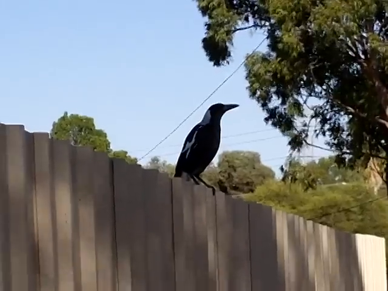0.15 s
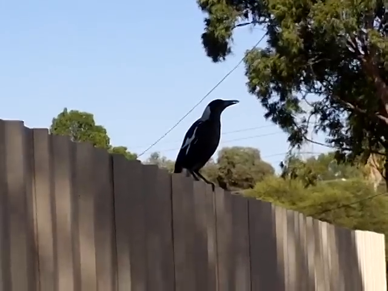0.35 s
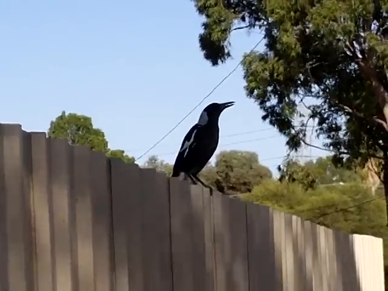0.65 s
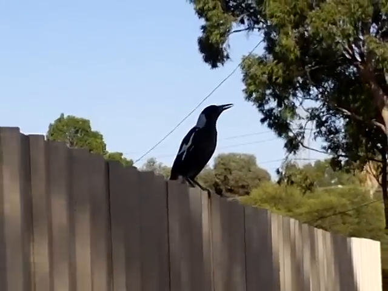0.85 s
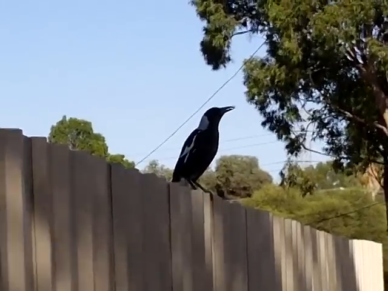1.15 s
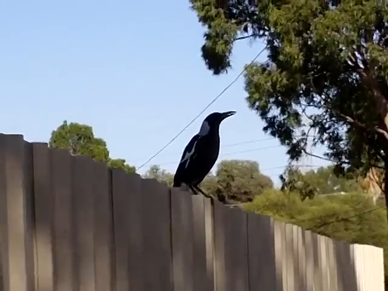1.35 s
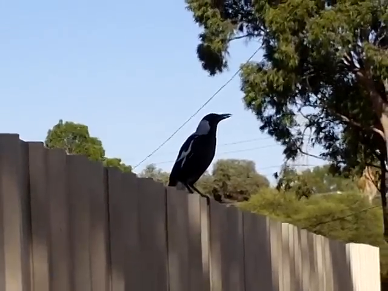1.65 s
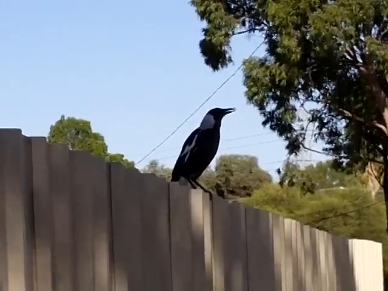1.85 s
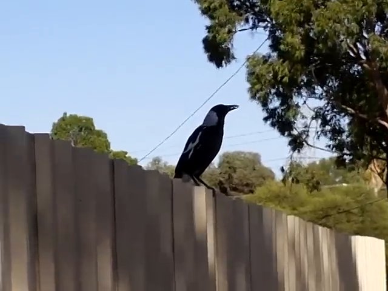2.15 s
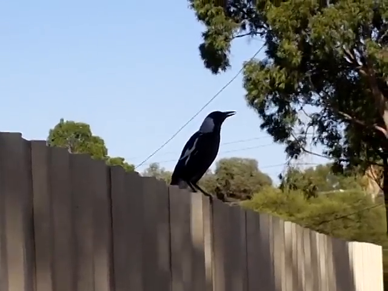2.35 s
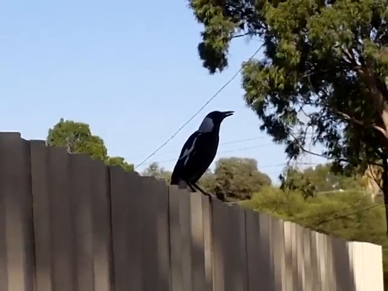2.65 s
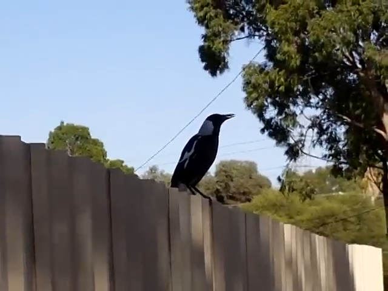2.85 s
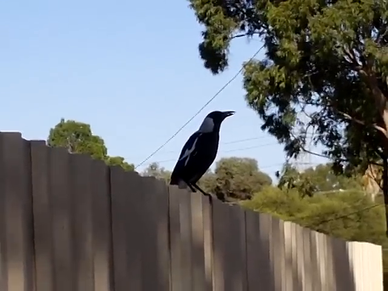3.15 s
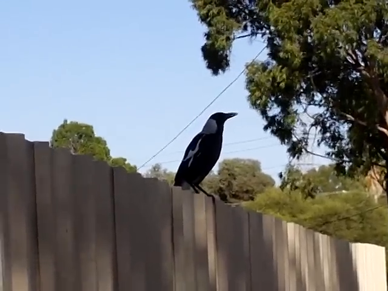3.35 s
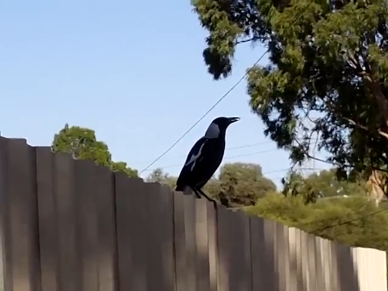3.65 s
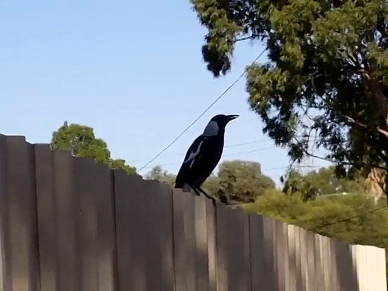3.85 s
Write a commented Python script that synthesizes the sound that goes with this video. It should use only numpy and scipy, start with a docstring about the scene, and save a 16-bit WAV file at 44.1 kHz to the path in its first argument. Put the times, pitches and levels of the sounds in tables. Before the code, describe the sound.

A magpie sings soft fluty warbling notes and gurgles while a nearer bird squawks twice sharply.

```python
"""Magpie song in a yard

A magpie sings soft fluty notes, pips, trills and gurgles, often in two voices: near sines with faint overtones.
A nearer bird squawks twice: harmonics and breath noise, shaken by a rattle and coloured by a throat.
Far birds whistle (gliding near sines) and buzz (throbbing band noise); traffic hums as shaped noise. Broad
noise gives the dying end of an earlier squawk at the outset and a passing swell later.
Fences and walls return echoes and a short tail; a phone microphone cuts the very top.
"""
import sys
import numpy as np
from scipy import signal
from scipy.fft import rfft, irfft
from scipy.io import wavfile
from scipy.ndimage import uniform_filter1d

SR = 44100
rng = np.random.default_rng(int(sys.argv[2]) if len(sys.argv) > 2 else 0)


def to_wav(s):
    """Save 16-bit WAV."""
    ch = np.atleast_2d(s).T  # columns
    pcm = np.round(np.clip(ch, -1, 1) * 32767)  # PCM
    wavfile.write(sys.argv[1], SR, pcm.astype(np.int16))


def convert_level_to_amplitude(level_db):
    """Map a level in decibels to its linear amplitude factor."""
    exponent = np.asarray(level_db, float) / 20
    return 10 ** exponent


N = 176400
T = np.arange(N) / SR


def level(x, db):
    """Normalisation: scale a signal to a given rms level."""
    return x * convert_level_to_amplitude(db) / np.sqrt(np.mean(x ** 2))


def walk(rate):
    """Random modulation: levels held 1 / rate s and slewed twice; spread near 1."""
    hold = int(SR / rate)
    steps = np.repeat(rng.standard_normal(N // hold + 1), hold)
    return 1.3 * uniform_filter1d(uniform_filter1d(steps, hold), hold)[:N]


def shade(hz, table):
    """Frequency response: gain interpolated over log frequency in a (hz, db) table."""
    table = np.array(table)
    return convert_level_to_amplitude(np.interp(np.log(hz + 1), np.log(table[:, 0]), table[:, 1]))


def add(out, start, x):
    """Superposition: mix x in from a time on."""
    i = int(start * SR)
    x = x[max(-i, 0):N - i]
    out[max(i, 0):max(i, 0) + len(x)] += x


# noise spectrum of the hum: pitch_hz [Hz], level_db [relative dB per Hz]
HUM_SPECTRUM = [(25, -36.5), (100, -18), (350, -13.5), (520, -9), (700, -6), (1100, 0.5), (1900, -11.5),
                (2500, -19), (5400, -25), (8500, -30), (11800, -36.5), (15500, -48.5)]


def traffic():
    """Shaped noise: a hum whose octave bands drift independently."""
    f = np.fft.rfftfreq(N, 1 / SR)
    octave = np.log2(f + 1)
    white = rfft(rng.standard_normal(N)) * shade(f, HUM_SPECTRUM)
    hum = np.zeros(N)
    for centre in range(4, 16):
        band = np.clip(1 - abs(octave - centre), 0, 1)
        hum += convert_level_to_amplitude(walk(3)) * irfft(white * band, N)  # drift near 1 dB
    return level(hum, -59.5)


# rushes of broad noise, the dying end of an earlier squawk, then a passing swell: start_s [s], rise_s [s],
# fall_s (decay constant) [s], level_db (at the crest) [dB], tilt_db (treble) [dB per octave]
RUSHES = [(-.05, 0.075, 0.11, -62.5, 8), (2.9, 0.1, 0.36, -54.5, -0.5)]


def rushes():
    """Noise bursts: the dying end of an earlier squawk, then a passing swell, as the hum's spectrum tilted."""
    out = np.zeros(N)
    f = np.fft.rfftfreq(N, 1 / SR)
    for start, rise, fall, db, tilt in RUSHES:
        band = (f > 450) / (1 + (f / 8500) ** 8)
        spectrum = shade(f, HUM_SPECTRUM) * convert_level_to_amplitude(tilt * np.log2(f + 1)) * band
        noise = irfft(rfft(rng.standard_normal(N)) * spectrum, N)
        t = np.clip(T - start, 0, None)
        out += level(noise, db) * np.where(t < rise, t / rise, np.exp(-(t - rise) / fall))
    return out


# distant buzzy calls: start_s [s], length_s [s], centre_hz [Hz], width_hz [Hz],
# level_db (before the swell and fade) [dB]
BUZZES = [(1.53, 0.38, 4620, 450, -69.5)]


def buzzes():
    """Amplitude modulation: a fast chirr, blurred by distance into a throbbing band of noise."""
    out = np.zeros(N)
    rate_hz, depth = 88, 0.35
    for start, length, hz, width, db in BUZZES:
        u = np.linspace(0, 1, int(length * SR))
        throb = 1 + depth * np.sin(2 * np.pi * rate_hz * length * u)
        chirr = rng.standard_normal(len(u)) * throb
        edges = (hz - width / 2, hz + width / 2)
        band = signal.sosfilt(signal.butter(3, edges, "band", fs=SR, output="sos"), chirr)
        add(out, start, level(band, db) * np.abs(np.sin(np.pi * u ** 0.53)) ** 0.97)
    return out


# overtones: pitch_hz (of the overtone) [Hz], level_db (relative to the note at full effort) [dB]
OVERTONES = [(1400, -6.5), (2050, -20.5), (2350, -49), (3300, -31), (4600, -33), (5800, -39.5), (8000, -63)]
FULL_EFFORT_DB = -40  # note level from which the overtones grow no further relative to it


def flute(hz, gain, bright=1):
    """Harmonic series: a near sine whose faint overtones grow with effort; gain is rms."""
    phase = 2 * np.pi * np.cumsum(hz) / SR
    effort = bright * np.minimum(uniform_filter1d(gain, size=1500) / convert_level_to_amplitude(FULL_EFFORT_DB), 1) ** 2
    overtones = sum(shade(k * hz, OVERTONES) * np.sin(k * phase) for k in range(2, 7))
    return np.sqrt(2) * gain * (np.sin(phase) + effort * overtones)


def pips(table):
    """Frequency glide under a raised-cosine envelope: each pip swells and fades as its pitch slides."""
    out = np.zeros(N)
    for mid, length, hz, glide, db in table:
        u = np.linspace(0, 1, int(length * SR))
        add(out, mid - length / 2, flute(hz + glide * (u - .5), convert_level_to_amplitude(db) * np.sin(np.pi * u) ** 2))
    return out


# distant whistles: middle_s [s], length_s [s], pitch_hz [Hz], glide_hz [Hz], peak_db (before the blur) [dB]
WHISTLES = [(1.37, 0.067, 3250, -259, -74), (2.821, 0.016, 4550, 343, -70), (3.099, 0.11, 6100, 225, -77),
            (0.017, 0.015, 1760, 300, -56), (.17, 0.22, 3630, 800, -69.5), (.25, .08, 3330, -200, -67.5),
            (.3, .2, 3670, -250, -73.5), (1.73, .26, 3990, 22, -75.5), (3.247, .035, 3140, 405, -68),
            (3.44, 0.36, 3204, -350, -75)]


def far_whistles():
    """Scintillation: far gliding whistles are blurred on the way by fast random gain."""
    return pips(WHISTLES) * (.5 + walk(600))


# squawks: start_s [s], length_s [s], pitch_hz (top of the arch, before the shaking) [Hz],
# arch (share of pitch), level_db (before the voice and breath mix and the envelope) [dB]
SQUAWKS = [(1.944, .043, 1898, 0.061, -40), (2.039, .072, 2577, .28, -35.5)]
# share of breath in the mix of each squawk
SQUAWK_BREATH = (.5, .24)
# rattle of each squawk: rate_hz [Hz], depth (share of pitch)
SQUAWK_RATTLE = ((280, .13), (309, 0.21))
# throat response, one table for each squawk: pitch_hz [Hz], level_db [relative dB]
SQUAWK_THROATS = ([(1500, -38), (1930, -7.5), (2620, -22), (3500, -8), (5450, -1.5), (6120, -10.5),
                  (6810, 1.5), (11100, -34), (15000, -24)], [(1700, -29), (2100, -13.5), (2500, -30),
                  (3500, -1.5), (4900, -3.5), (6200, -6), (7300, -11.5), (11100, -31), (15000, -27)])


def squawks():
    """Source and filter: a tone of arching pitch, shaken by a rattle that also gates the breath."""
    out, shake = np.zeros(N), walk(900)
    attack, jitter = .33, .006  # share of length, share of pitch
    k = np.arange(1, 8)[:, None]  # harmonic numbers
    f = np.fft.rfftfreq(4096, 1 / SR)
    for call, noise, (rate, depth), throat in zip(SQUAWKS, SQUAWK_BREATH, SQUAWK_RATTLE, SQUAWK_THROATS):
        start, length, hz, arch, db = call
        u = np.linspace(0, 1, int(length * SR))
        rising = u < attack
        bow = np.where(rising, u / attack, (1 - u) / (1 - attack))
        rattle = abs(np.cos(np.pi * rate * length * u))
        pitch = hz * (1 - arch * (1 - bow) ** 2 * np.where(rising, 1, .5))  # the fall is half as deep
        pitch = pitch * (1 - depth * (1 - rattle))
        pitch = pitch * (1 + jitter * shake[int(start * SR):][:len(u)])
        phase = 2 * np.pi * np.cumsum(pitch) / SR
        voiced = (shade(k * pitch, throat) * np.sin(k * phase)).sum(axis=0)
        breath = irfft(rfft(rng.standard_normal(4096)) * shade(f, throat))[:len(u)]
        mix = (1 - noise) * level(voiced * (0.38 + rattle), 0) + noise * level(breath * (.5 + rattle), 0)
        envelope = bow ** np.where(rising, .7, .8) * np.clip((1 - u) / 0.054, 0, 1)
        add(out, start, convert_level_to_amplitude(db) * mix * envelope)
    return out


# throaty gurgles between the notes: start_s [s], length_s [s], peak_db (of the loudest possible blip) [dB]
GURGLES = [(0.8, 0.087, -58), (1.327, 0.12, -54), (1.71, .29, -57), (2.651, .25, -55.5), (3.6, .4, -64)]
# lowest and highest middle pitch of the blips [Hz]
GURGLE_HZ = (600, 2100)


def gurgles():
    """Granular texture: quick soft blips of log-uniform random pitch, the higher the softer."""
    lo, hi = GURGLE_HZ
    per_s = 130
    blips = []
    for start, length, db in GURGLES:
        for a, b, c, d, e in rng.random((int(length * per_s), 5)):
            pitch = lo * (hi / lo) ** c
            blips.append((start + a * length, .008 + .014 * b, pitch, 300 * (d - .5), db - 10 * c - 6 * e))
    return pips(blips)


# trills: start_s (middle of the first pulse) [s], spacing_s [s], pitch_hz [Hz],
# peak_db (after the softer first pulse) [dB]
TRILLS = [(.448, 0.012, 978, -42.5), (.489, 0.015, 936, -47.5), (.515, .0135, 964, -44),
          (2.612, 0.012, 1122, -44.5)]


def trills():
    """Pulse train: three quick, slightly overlapping pulses of steady pitch."""
    soft_start_db, duty = 7.5, 1.1  # dB, pulse length as share of spacing
    pulses = []
    for start, gap, hz, db in TRILLS:
        for k in range(3):
            pulses.append((start + k * gap, duty * gap, hz, 0, db - soft_start_db * (k == 0)))
    return pips(pulses)


WAVER_DB, SOFT_WAVER = .6, 4  # loudness waver of loud notes; most extra multiples of it when soft
# short pips: middle_s [s], length_s [s], pitch_hz [Hz], glide_hz [Hz], peak_db (before the waver) [dB]
PIPS = [(0.412, 0.048, 1345, -12, -47.5), (0.414, 0.085, 1164, -37, -52), (0.414, 0.083, 992, 30, -53),
        (0.582, 0.043, 996, -66, -50.5), (0.648, 0.046, 986, -109, -56.5), (0.828, 0.011, 1086, 88, -40),
        (0.859, 0.058, 992, 22, -49.5), (0.973, 0.021, 1350, -70, -50), (0.989, 0.039, 1168, -16, -45),
        (0.992, 0.027, 994, 45, -45.5), (1.063, 0.105, 1008, -71, -53.5), (1.383, 0.039, 1557, 62, -51.0),
        (1.729, 0.034, 762, 77, -56.5), (1.843, 0.007, 1256, -99, -43.5), (1.867, 0.021, 995, 86, -46),
        (1.947, 0.073, 1170, -7, -55), (2.039, 0.092, 717, -71, -59), (2.173, 0.037, 1192, 8, -45.5),
        (2.683, 0.066, 1310, 235, -47.5), (2.716, 0.032, 992, 21, -52), (2.782, 0.03, 1578, -220, -54.5),
        (2.827, 0.022, 1149, 16, -40), (2.842, 0.026, 1012, 12, -46), (2.861, 0.029, 1142, -10, -46.5),
        (3.64, 0.041, 1405, -92, -55.5), (3.729, 0.02, 1146, 80, -44.5), (3.766, 0.019, 1098, -150, -53),
        (3.799, 0.032, 990, -63, -50.5), (3.839, 0.06, 687, 17, -53), (3.874, 0.079, 1055, 22, -46.5),
        (3.945, 0.036, 1157, 10, -51.8)]


def short_pips():
    """Amplitude flutter: gliding pips under a random gain in dB."""
    return pips(PIPS) * convert_level_to_amplitude(SOFT_WAVER * WAVER_DB * walk(150))


# held notes, one table each: time_s [s], pitch_hz (before the waver) [Hz], level_db (before the waver) [dB]
HELD = [
    [(0.56, 1167, -55), (0.58, 1158, -56), (0.62, 1177, -47), (0.65, 1251, -53.5), (0.665, 1224, -42),
     (0.685, 1182, -42), (0.715, 1145, -38), (0.727, 1127, -44), (0.765, 1135, -38.5), (0.785, 1151, -42),
     (0.797, 1145, -65)],
    [(1.005, 1196, -56), (1.03, 1213, -52.5), (1.055, 1197, -41.5), (1.097, 1148, -41.5),
     (1.108, 1139, -44), (1.125, 1158, -44), (1.15, 1172, -54), (1.24, 1152, -57)],
    [(0.8, 1140, -53.5), (0.82, 1167, -53), (0.88, 1160, -49.5), (0.895, 1120, -71)],
    [(2.338, 1194, -61), (2.352, 1155, -43.5), (2.385, 1186, -48.5), (2.41, 1167, -55), (2.49, 1134, -65.5)],
    [(2.197, 1032, -46.5), (2.21, 1056, -43.5), (2.255, 1040, -41), (2.268, 993, -45), (2.295, 1006, -47.5),
     (2.308, 1018, -60), (2.335, 1044, -53)],
    [(3.175, 1018, -73), (3.195, 1035, -49), (3.208, 1037, -47), (3.245, 1006, -38.5),
     (3.282, 972.6, -47.5), (3.297, 986, -43.5), (3.325, 1002, -58), (3.365, 995.5, -50.0),
     (3.44, 973, -58)],
    [(1.42, 771, -62), (1.44, 753, -54), (1.465, 721.6, -50.5), (1.512, 715.4, -47.5), (1.528, 736, -64.5),
     (1.64, 727, -77)],
    [(2.5, 670, -65.1), (2.52, 709, -64), (2.58, 742, -56)],
    [(2.95, 720, -63.5), (3.265, 708, -65.5)],
    [(3.345, 732, -62), (3.38, 706, -56.5), (3.475, 730, -73)],
]


def held_notes():
    """Pitch and loudness contours: tones follow drawn curves with random waver, louder-softer more when soft."""
    out, shake, waver = np.zeros(N), walk(60), walk(70)
    waver_hz, edge_s = 6, 0.002
    for note in HELD:
        s, hz, db = np.array(note).T
        on = (T >= s[0]) & (T < s[-1])
        t = T[on]
        loud = np.interp(t, s, db)
        soft = np.clip((FULL_EFFORT_DB - loud) / 2 - 3, 1, SOFT_WAVER + 1)
        edge = np.clip(np.minimum(t - s[0], s[-1] - t) / edge_s, 0, 1)
        pitch = np.interp(t, s, hz) + waver_hz * shake[on]
        gain = edge * convert_level_to_amplitude(loud + WAVER_DB * soft * waver[on])
        bright = convert_level_to_amplitude(2 * waver[::-1][on])  # the overtones waver on their own
        add(out, s[0], flute(pitch, gain, bright))
    return out


def magpie():
    """Superposition of voices: held notes, pips, trills and gurgles may overlap."""
    return held_notes() + short_pips() + trills() + gurgles()


# echoes: delay_s [s], level_db (relative to the direct sound, before the low-pass) [dB]
ECHOES = [(0.13, -18.5), (0.242, -37.5)]


def yard(x):
    """Reflection and reverberation: blurred echoes from fences and walls and a diffuse tail, all dulled."""
    tail_db, t60_s, build_s = -14.5, 1.3, 0.011  # tail level before build-up and low-pass
    blur_s, top_hz = 0.0039, 6500
    t = T[:SR]  # the response is cut off at 1 s
    decay = 2 * np.log(1000) / t60_s
    energy = convert_level_to_amplitude(2 * tail_db) * decay * np.exp(-decay * t) * (1 - np.exp(-t / build_s))
    for delay, db in ECHOES:
        blur = np.exp(-.5 * ((t - delay) / blur_s) ** 2) / blur_s / np.sqrt(2 * np.pi)
        energy = energy + convert_level_to_amplitude(2 * db) * blur
    grains = rng.standard_normal(SR) * np.sqrt(energy / SR)
    response = signal.lfilter(*signal.butter(2, top_hz, fs=SR), grains)
    return x + signal.fftconvolve(x, response)[:N]


def scene():
    """Superposition: whistles, squawks and magpie with their echoes, over traffic, rushes and buzzes."""
    birds = far_whistles() + squawks() + magpie()
    return (traffic() + rushes() + buzzes() + yard(birds))[None]


def roll_off(x):
    """The treble ends steeply here."""
    return signal.sosfilt(signal.butter(12, 15610, fs=SR, output="sos"), x)


def record(dry):
    """Band limiting: the phone's steep low-pass removes the very top."""
    cut = signal.ellip(8, .2, 60, 15100, fs=SR, output="sos")  # ripple dB, stop dB, edge Hz
    mix = signal.sosfilt(cut, dry)
    return roll_off(mix)


dry = scene()
out = record(dry)
to_wav(out)
```